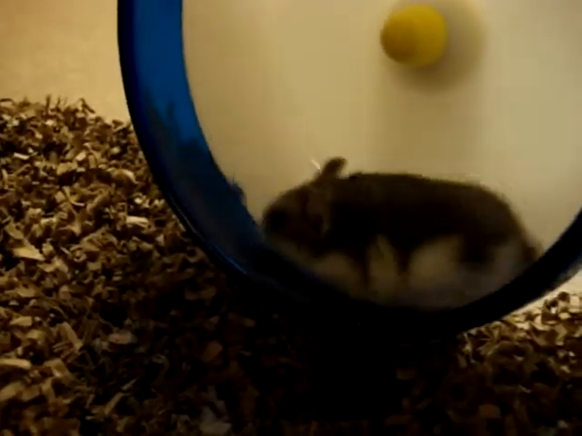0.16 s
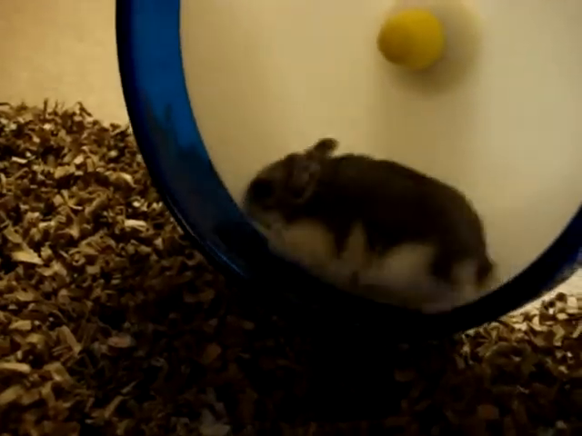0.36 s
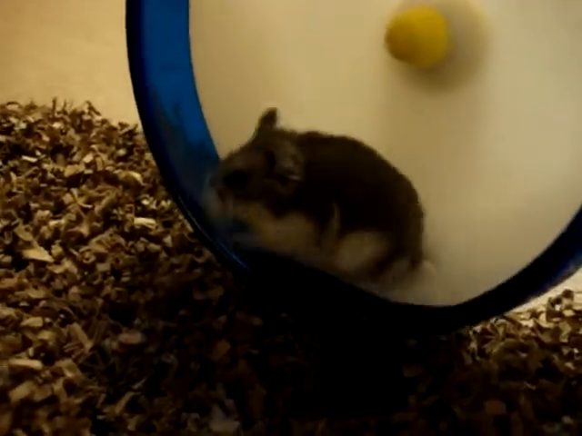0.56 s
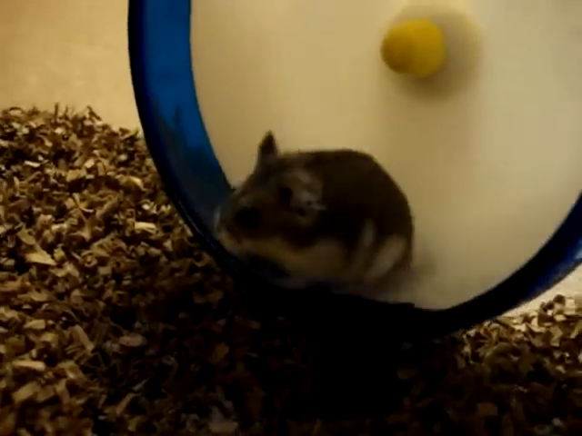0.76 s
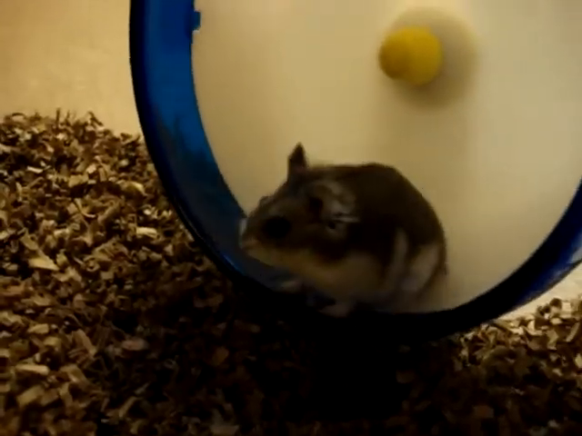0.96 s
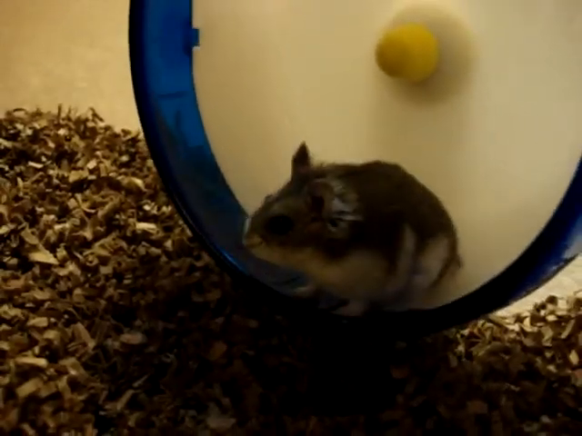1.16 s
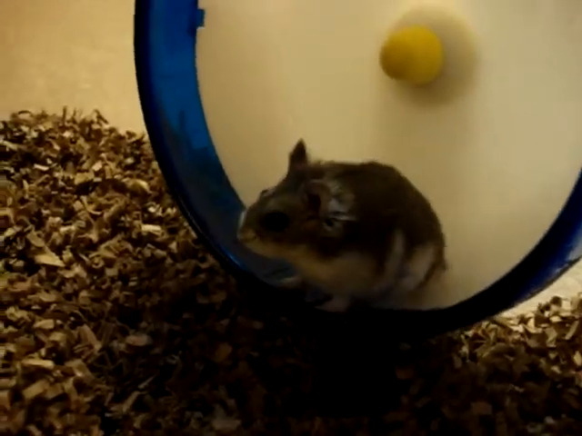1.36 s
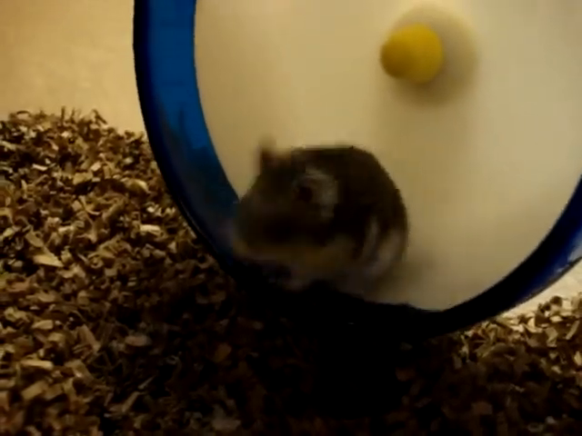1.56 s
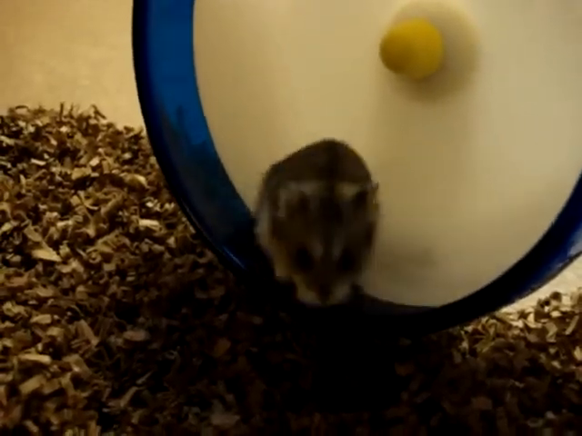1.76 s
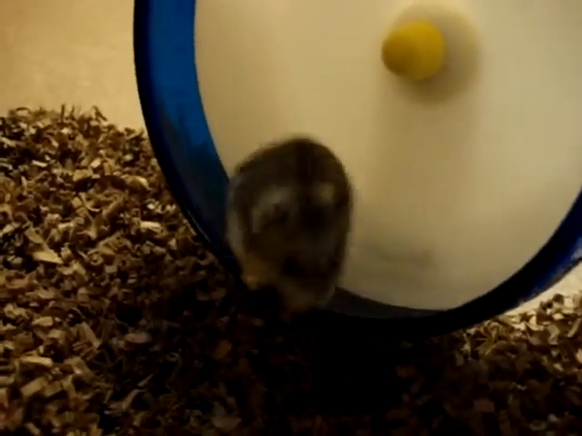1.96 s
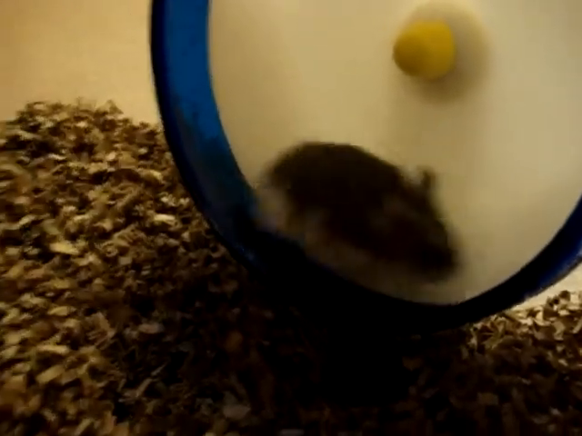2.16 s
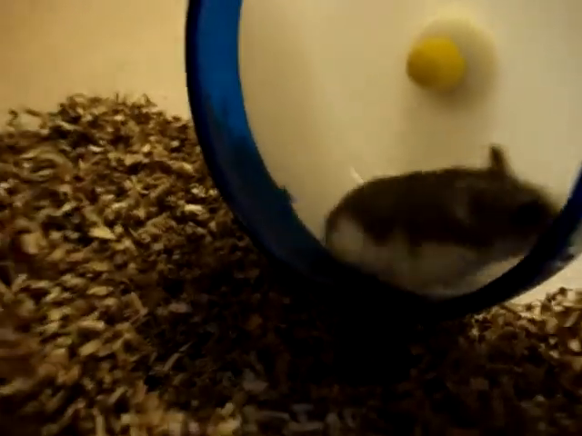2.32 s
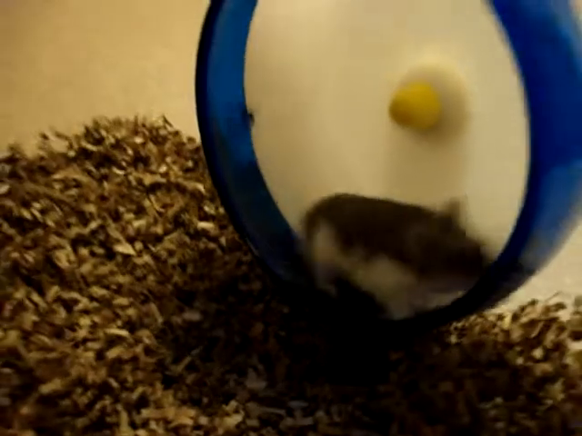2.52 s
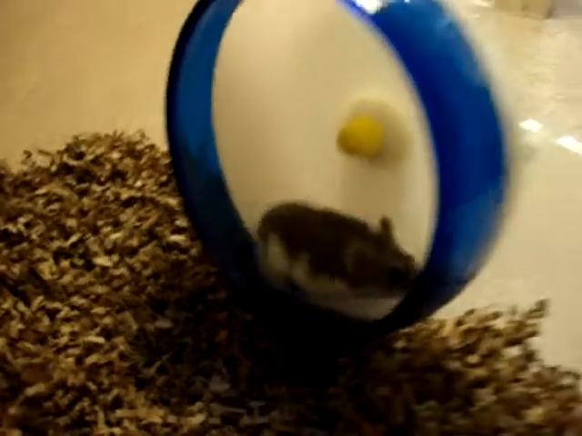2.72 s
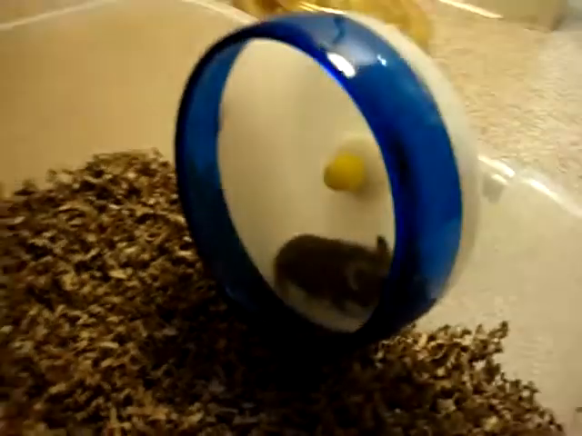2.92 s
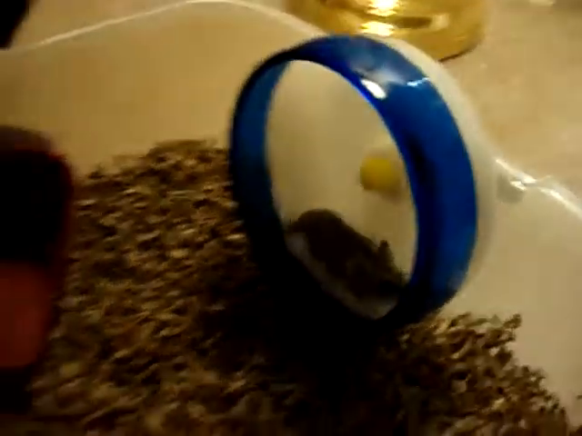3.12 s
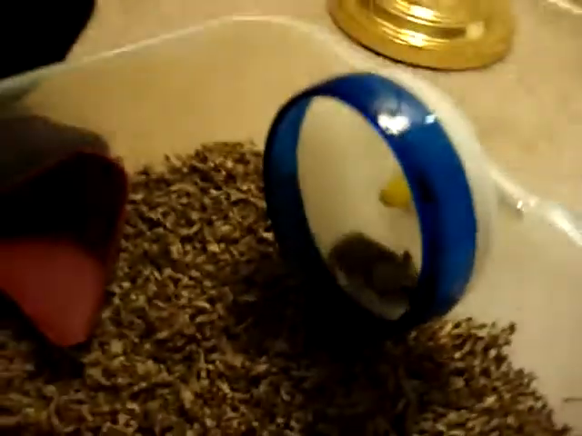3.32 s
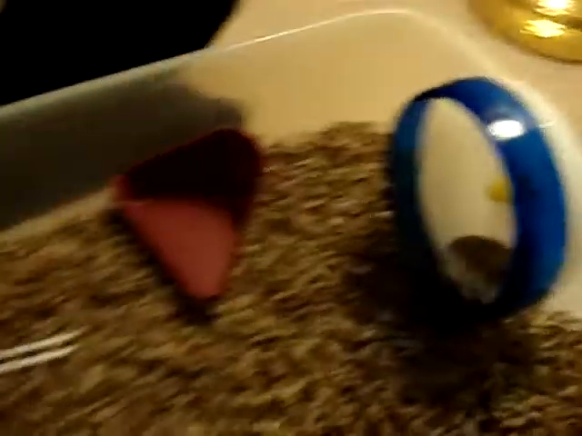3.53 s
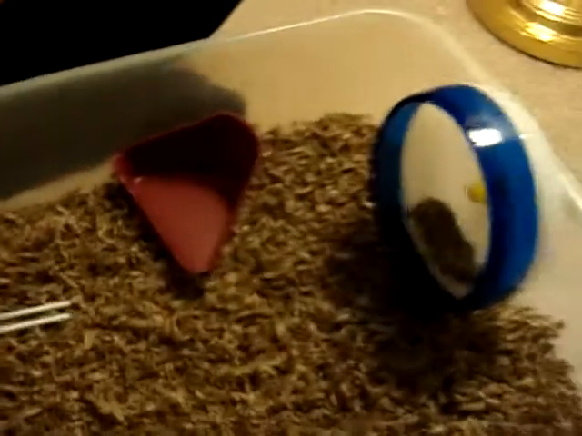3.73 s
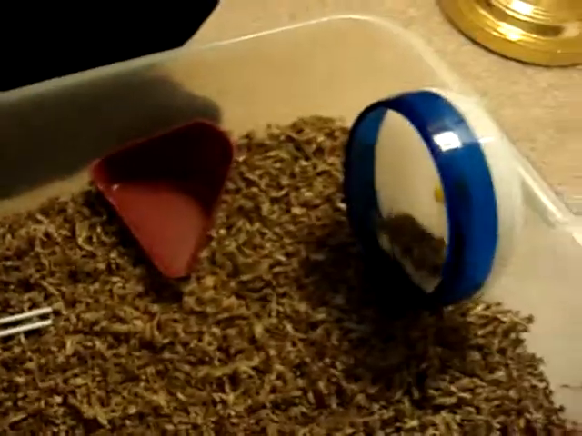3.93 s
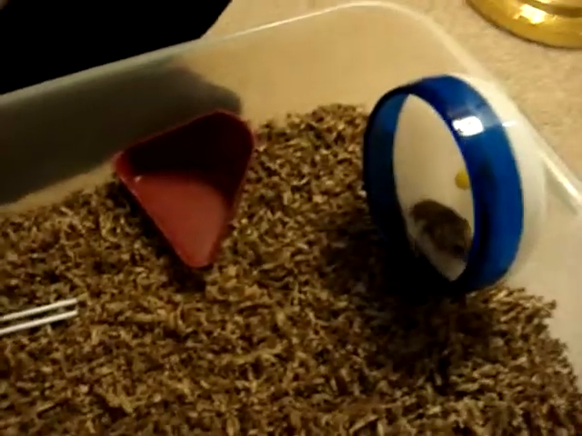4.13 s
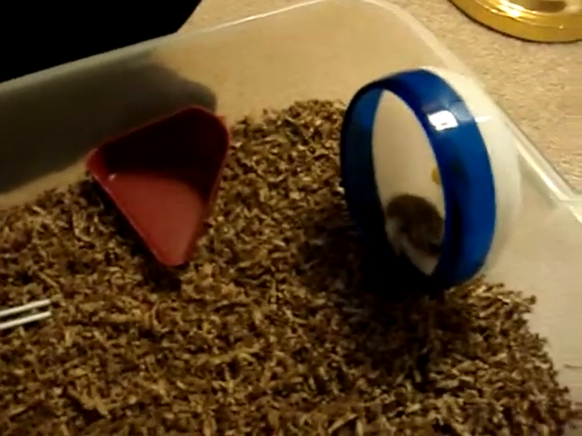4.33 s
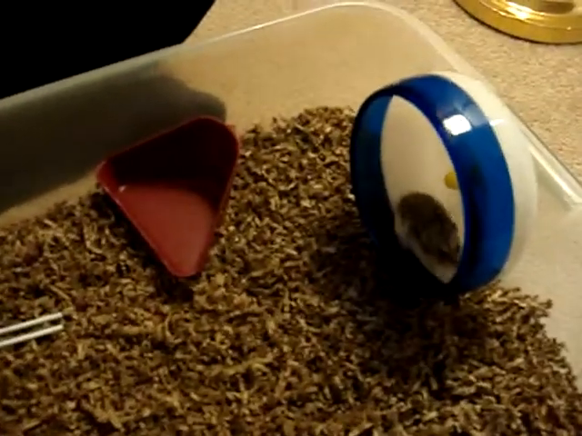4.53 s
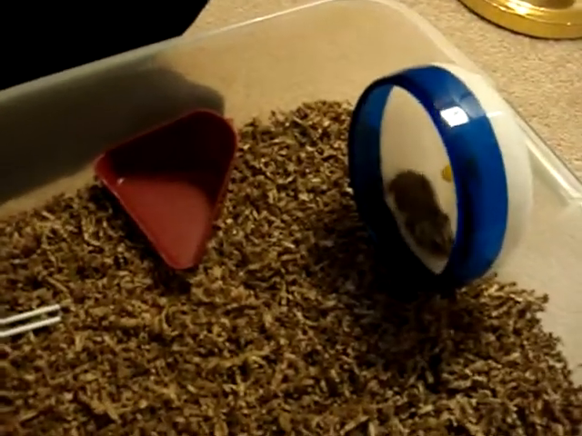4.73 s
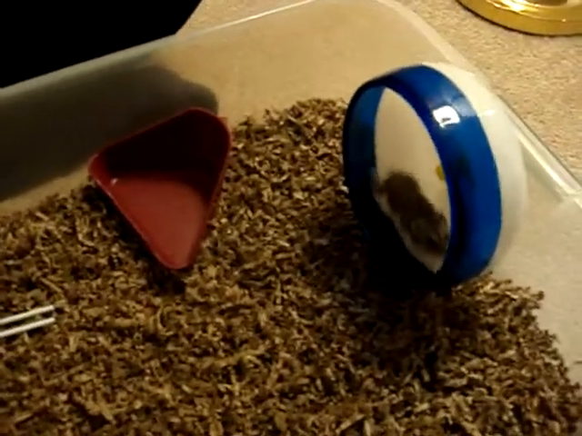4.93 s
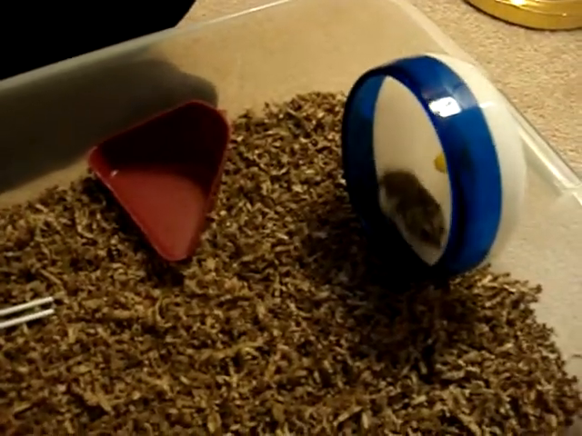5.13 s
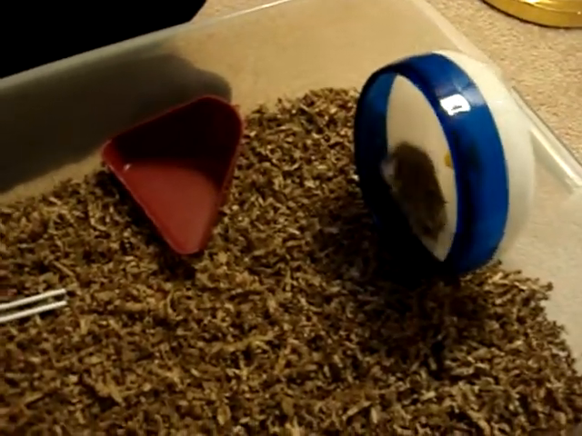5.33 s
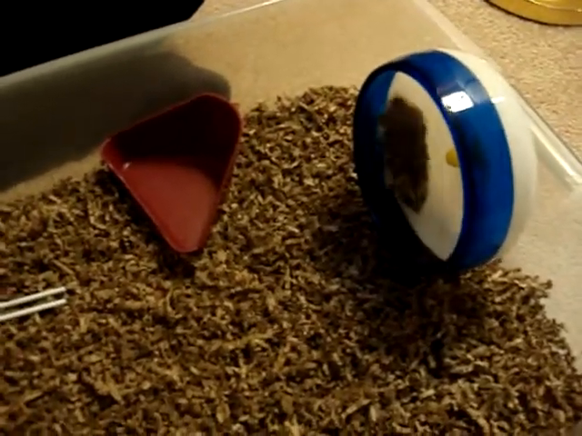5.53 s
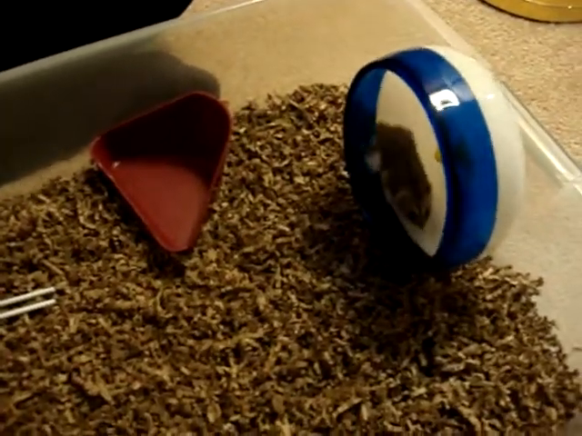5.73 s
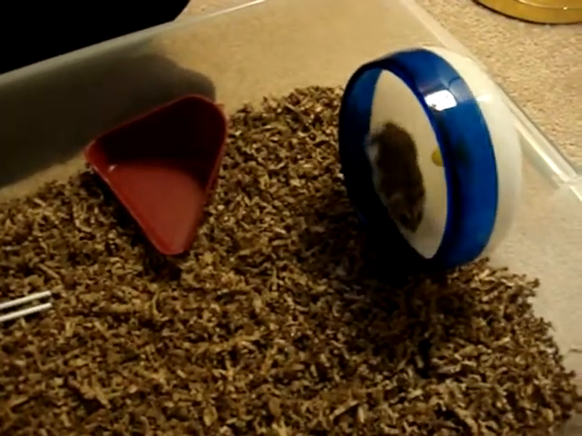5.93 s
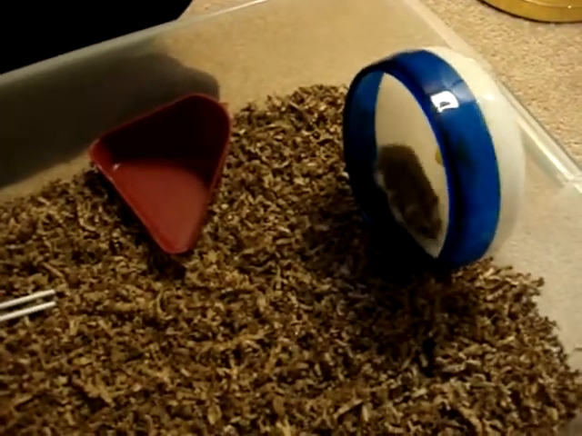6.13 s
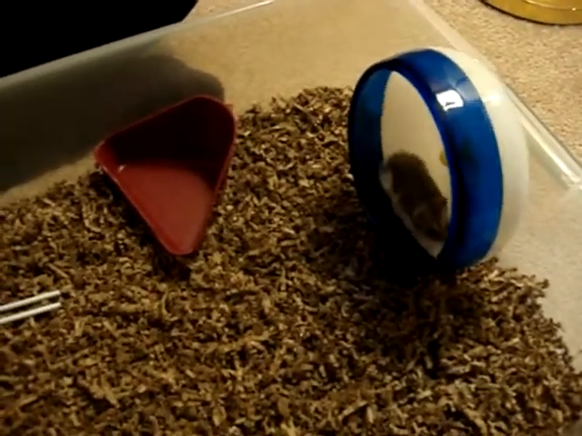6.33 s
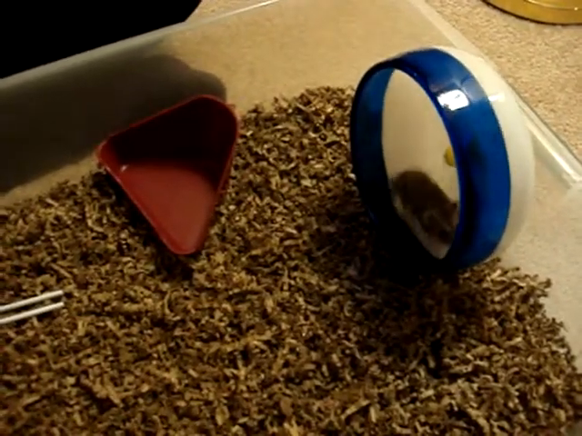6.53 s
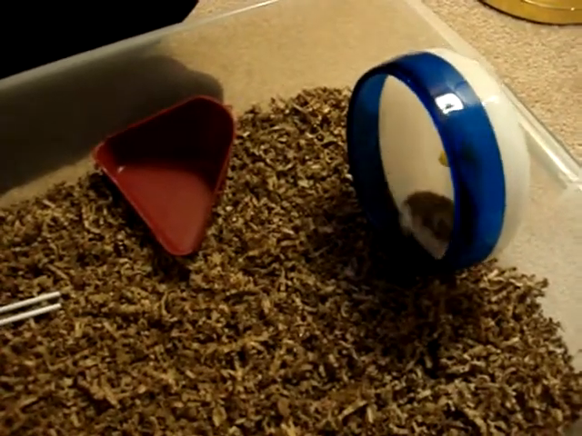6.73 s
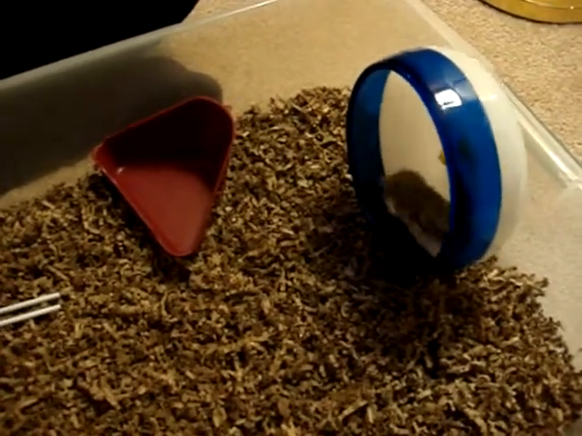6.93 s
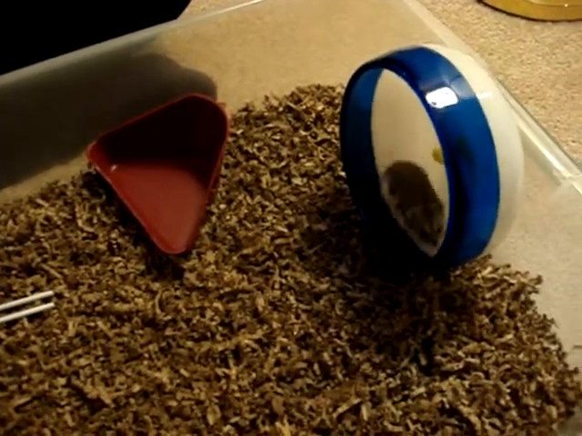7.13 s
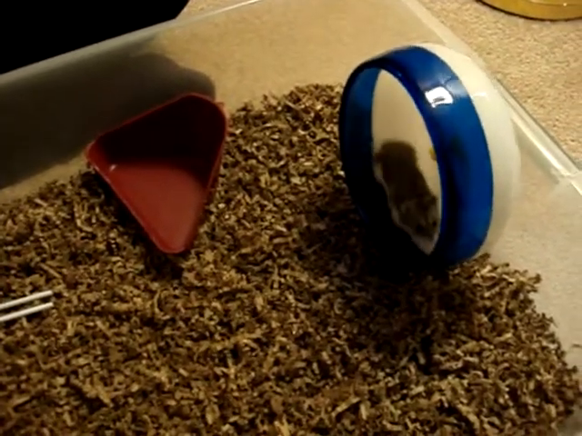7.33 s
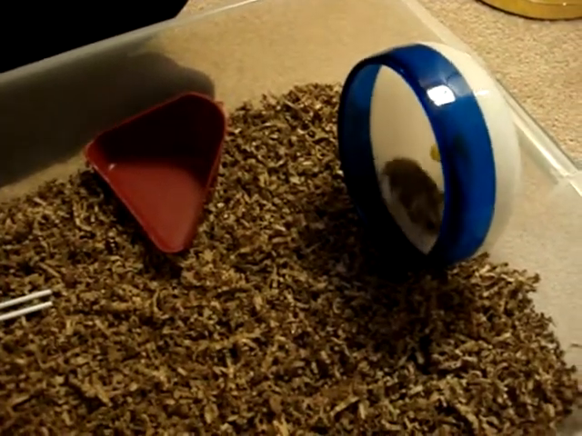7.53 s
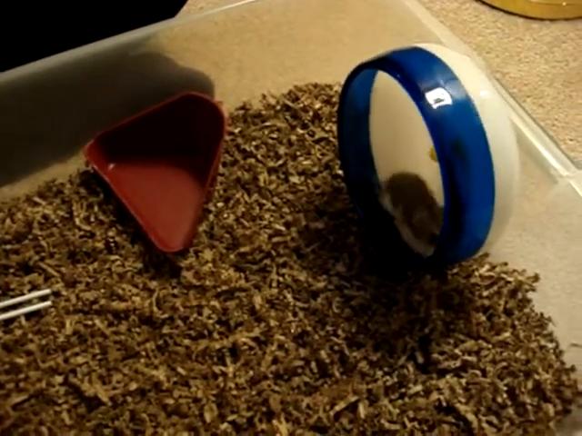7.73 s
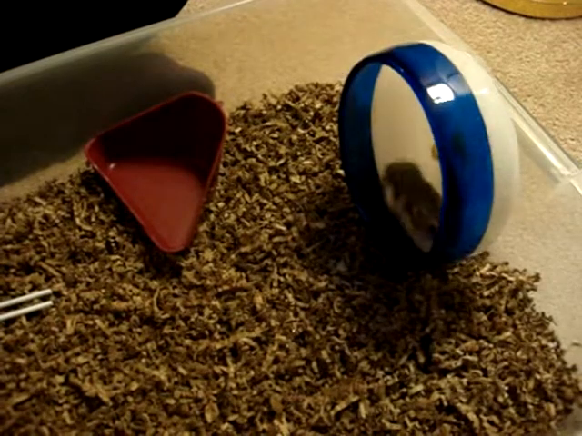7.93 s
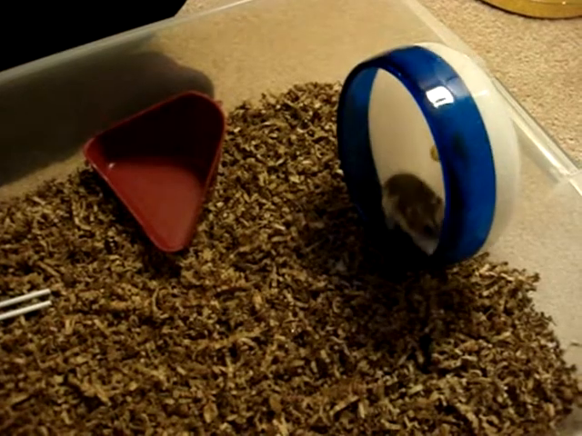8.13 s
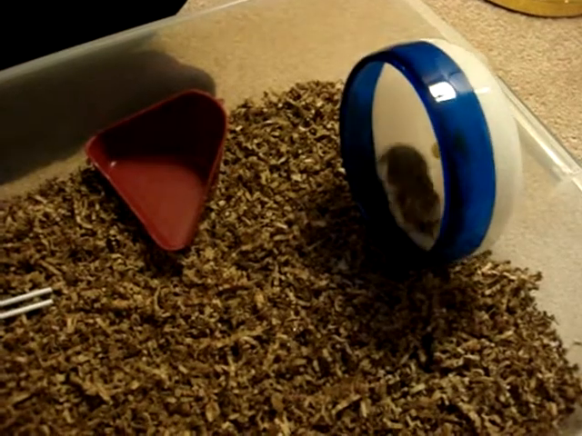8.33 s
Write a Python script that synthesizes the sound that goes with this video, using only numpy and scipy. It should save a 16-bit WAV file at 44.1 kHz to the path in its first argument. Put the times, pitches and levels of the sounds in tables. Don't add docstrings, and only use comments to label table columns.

```python
import sys
import numpy as np
from scipy import signal
from scipy.fft import rfft, irfft
from scipy.io import wavfile
from scipy.ndimage import uniform_filter1d, minimum_filter1d, map_coordinates

SR = 44100
rng = np.random.default_rng(int(sys.argv[2]) if len(sys.argv) > 2 else 0)


def makeup_ratio(level_db):
    decades = np.asarray(level_db, float) / 20
    return 10 ** decades


def generate_wav(signal):
    frames = np.transpose(np.atleast_2d(signal))
    scaled = np.clip(frames, -1, 1) * 32767
    pcm = np.round(scaled).astype(np.int16)
    wavfile.write(sys.argv[1], SR, pcm)


N = 368876
TIME = np.arange(N) / SR
SPAN = 4096
IMPACT_TIME = TIME[:SPAN // 2]


def unit(x):
    return x / np.sqrt(np.mean(x ** 2))


def decay(t, t60_s):
    return np.exp(-np.log(1000) * t / t60_s)


def shaped(points, shape=N):
    hz, db = np.transpose(points)
    noise = rng.standard_normal(shape)
    size = noise.shape[-1]
    bin_hz = np.fft.rfftfreq(size, 1 / SR) + 1
    gain = makeup_ratio(np.interp(np.log(bin_hz), np.log(hz), db, left=-90, right=-90))
    return unit(irfft(rfft(noise) * gain, size))


def walk(rate_hz):
    width = int(SR / rate_hz)
    once = uniform_filter1d(rng.standard_normal(N), width)
    return unit(uniform_filter1d(once, width))


def swells(rows):
    return sum(rise_db * np.exp(-((TIME - s) / half_s) ** 2 / 2) for s, rise_db, half_s in rows)


def grit(shape, scatter_db):
    size = np.minimum(rng.exponential(size=shape), 3.5)
    return rng.standard_normal(shape) * makeup_ratio(scatter_db * size)


def chatter(length_s, scatter_db, after_db, after_s):
    u = IMPACT_TIME / np.clip(length_s, .0005, .02)[:, None]
    swell = u * np.exp(-u ** 2 / 2)
    rattle = makeup_ratio(after_db) * (1 - np.exp(-u ** 2)) * np.exp(-(IMPACT_TIME / after_s) ** 2)
    return grit(u.shape, scatter_db) * (swell + rattle)


def ring(modes, count, spot_db, detune):
    chance = rng.standard_normal((count, 2, len(modes)))
    out = np.zeros((count, SPAN // 2))
    for k, (hz, db, t60_s) in enumerate(modes):
        mode_hz = hz * (1 + detune * chance[:, 0, k, None])
        gain = makeup_ratio(db + spot_db * chance[:, 1, k, None])
        out += gain * np.sin(2 * np.pi * mode_hz * IMPACT_TIME) * decay(IMPACT_TIME, t60_s)
    return out


def dense(push, points, db, t60_s):
    fade = decay(TIME[None, :SPAN // 2 + 1], t60_s) ** 2
    power = signal.fftconvolve(push ** 2, fade, axes=1)
    noise = shaped(points, power.shape)
    return makeup_ratio(db) * noise[:, :-1] * np.sqrt(np.abs(power))[:, :-1]


def place(start_s, peak_db, sounds):
    out = np.zeros(N + 2 * SPAN)
    sounds = sounds * (makeup_ratio(peak_db) / np.abs(sounds).max(axis=1))[:, None]
    for start, row in zip((start_s * SR).astype(int) + SPAN, sounds):
        out[start:start + len(row)] += row
    return out[SPAN:SPAN + N]


# start_s, drum_db, upper_drum_db (re drum), rim_db, treble_db (re rim)
BLOWS = [(.821, -13, 0.5, -7.5, 3.5), (3.076, -29.5, 6, -27, -1.5), (3.151, -20, -.6, -37.5, -19),
         (3.294, -19, -1, -28.5, -26), (3.337, -23, 2.5, -31, -4.5), (3.731, -22.5, 1, -26, -7),
         (3.781, -22, 0.5, -26, -6.5), (4.268, -12.5, -0.5, -15, -14.5), (4.506, -19, 2, -23, -5.5),
         (4.562, -8.5, -5, -12, -7.5), (4.875, -16.5, -5.5, -28, -8), (4.915, -6.5, -7, -10.5, -9.5),
         (4.954, -22, 8.5, -18, -10.5), (5.192, -13.5, -10, -23.5, -9), (5.252, -17.5, 4.5, -20.5, -11.5),
         (5.56, -7.5, -11, -21, -6.5), (5.621, -10, -1.5, -14.5, -19), (5.661, -28.5, 13, -18, -14.5),
         (5.982, -14, -3, -20.5, -5), (6.646, -17, 7, -12.5, -13), (7.179, -16.5, -1.2, -25, -23),
         (8.181, -17.5, -3, -24, -29), (8.209, -23.5, 11, -14, -12.5)]
BOUNCES = [(3.186, -21.5, -2, -35.5, -3), (3.84, -24.5, 0, -45, -2), (3.888, -30.5, 9, -43, -29),
           (4.168, -22, -5.5, -37, -1), (4.227, -23, -1, -38, -12), (4.449, -29.5, 10, -47, -43),
           (4.524, -18.5, 5.5, -28.5, -14), (4.616, -14, -3, -23.5, -12), (5.071, -26, -12, -41.5, -2),
           (5.289, -22, 7.5, -24.5, -20), (5.601, -40.5, 17.5, -37, -34), (6.047, -29, 1.5, -42, -5),
           (6.115, -19.5, -9.5, -43, -20), (6.158, -21, 1.5, -29.5, -16), (6.607, -29, 8, -55, -8),
           (6.692, -30, 7.5, -40, -8), (6.782, -20.5, -3.3, -60, -8), (7.309, -23.5, -8, -38.5, -24),
           (7.651, -19, -2, -34.5, -19), (7.699, -26.5, 2, -50, -20), (7.784, -29, 1.5, -36, -25),
           (8.077, -25.5, -2.5, -35, -25), (8.12, -22.5, -1, -35, 0.5), (8.159, -29, -2, -54, -24)]
# start_s, peak_db, upper_drum_db (re peak)
KNOCKS = [(3.169, -28.5, -18), (3.211, -28, -5), (3.385, -24, -5), (3.484, -30, -22), (3.802, -23.5, 0.5),
          (4.05, -29, -15), (4.103, -33, -26), (4.246, -19, -1), (4.395, -30, -19), (4.597, -31, 17),
          (4.651, -32, 10), (4.968, -17.5, -13.5), (5.034, -29, -13), (5.145, -30, -27), (5.232, -34, 9),
          (5.374, -30, -26), (5.682, -18.5, -18), (5.731, -23.5, -20), (5.92, -31, -23), (6.238, -38, -21),
          (6.296, -32, -8), (6.719, -22, -9), (6.764, -27, 0.5), (7.254, -36, -2), (7.493, -48, -15),
          (7.588, -35, -30), (7.675, -26, 1.5), (8.046, -29, -26), (8.108, -38, 5), (8.234, -20.5, 4)]
# start_s, peak_db, upper_drum_db
# (re peak), main_hz
SOFT_KNOCKS = [(.004, -34.5, -26, 718), (.053, -39.5, -21, 784), (.13, -37.5, -23, 780),
               (.189, -38.5, -17, 794), (.287, -43.5, 3, 740), (.462, -38, -22, 728), (.556, -26, -8, 802),
               (.574, -32.5, -23, 792), (.724, -27, -33, 733), (0.781, -15, -5.5, 796),
               (.799, -21, -17, 701), (2.182, -39, -3, 810), (2.28, -30, -3, 757), (2.373, -38, 1.5, 807),
               (2.464, -33, -7, 694), (2.601, -30, -21, 732), (2.909, -31.5, -11, 671)]
# mode_hz, level_db, t60_s
DRUM_MODES = [(735.5, 3, 0.062), (775, 11.5, 0.033), (787, 1, 0.064)]
# mode_hz, level_db, t60_s
UPPER_DRUM_MODES = [(508, -2, 0.052), (690, 5.5, 0.012), (965, 10, 0.025), (986, -9, 0.044),
                    (1160, 15, 0.0078), (1313, -7.5, 0.036), (1366, -4.5, 0.04), (1494, 0, 0.054),
                    (1446, -14.5, 0.21), (1860, -34.5, 0.082)]


def knocks():
    chatter_s, build_up_s = .005, .0058
    drum_lag_s = .0045
    both = np.array(BLOWS + BOUNCES)[:, :3] + [drum_lag_s, 0, 0]
    soft = np.array(SOFT_KNOCKS)
    s, peak_db, upper_db = np.vstack([soft[:, :3], both, KNOCKS]).T
    count = len(s)
    main_hz = 775 * (1 + 0.023 * rng.standard_normal(count))
    main_hz[:len(soft)] = soft[:, 3]
    t = IMPACT_TIME
    push = chatter(np.full(count, chatter_s), scatter_db=3.0, after_db=-7.5, after_s=0.031)
    wave = np.sin(2 * np.pi * main_hz[:, None] * t)
    main = wave * decay(t, 0.038) + makeup_ratio(-14.5) * ring(DRUM_MODES, count, spot_db=6.0, detune=0.022)
    in_step = makeup_ratio(-3.5) * wave * t / build_up_s * np.exp(-(t / build_up_s) ** 2 / 2)
    low = signal.fftconvolve(push + in_step, main, axes=1)
    high = signal.fftconvolve(push, ring(UPPER_DRUM_MODES, count, spot_db=6.0, detune=0.019), axes=1)
    high = high + dense(push, SCUFF_TONE, db=-6.5, t60_s=0.18)
    start_s = s - 1.1 * chatter_s
    return place(start_s, peak_db, low) + place(start_s, peak_db + upper_db, high)


# start_s, peak_db, treble_db
TICKS = [(0.532, -45, -10), (.774, -20, -6), (1.35, -43, -6), (2.252, -32, -23), (2.51, -43.5, 6.5),
         (2.598, -45, 15), (2.746, -40.5, -6), (2.846, -38.5, 5), (2.901, -38, -4), (2.939, -43, 4),
         (3.031, -39.5, 4), (3.433, -36.5, -10.5), (3.451, -41, 0), (3.994, -41, -20.1), (4.426, -31, -3.5),
         (4.729, -36, -17), (4.847, -46, 2), (5.048, -39.5, -5), (5.404, -51, 5), (5.547, -23.5, 2.3),
         (5.782, -35, 10), (5.848, -37, -5), (5.91, -39, 6.5), (6.508, -40, 8), (6.801, -43, -17),
         (7.082, -43.5, 7), (7.417, -41.5, 0), (7.599, -37, 6), (7.9, -43, -10), (8.057, -39, 9)]
# mode_hz, level_db, t60_s
RIM_MODES = [(2490, -1, 0.024), (2650, -3.5, 0.028), (2820, -24, 0.01), (3434, 1.5, .025),
             (3200, -1.5, 0.0077), (4700, -19.5, 0.0064)]
# freq_hz, density_db (per Hz)
RIM_DENSE = [(1000, -3), (1800, -10.5), (2700, 1.5), (3500, 2), (4600, -4), (5600, -6.5)]
# freq_hz, density_db (per Hz)
RIM_TREBLE = [(3300, -21.5), (4300, -0.2), (6500, -1.5), (8000, -5), (10000, -14.5), (11000, -42)]


def ticks():
    both = np.array(BLOWS + BOUNCES)[:, [0, 3, 4]]
    s, peak_db, treble_db = np.vstack([both, TICKS]).T
    length_s = np.repeat([.0042, .007, .0025], [len(BLOWS), len(BOUNCES), len(TICKS)])
    push = chatter(length_s, scatter_db=5.0, after_db=-11.5, after_s=3.9 * length_s[:, None])
    low = signal.fftconvolve(push, ring(RIM_MODES, len(s), spot_db=7.0, detune=0.023), axes=1)
    low = low + dense(push, RIM_DENSE, db=4.5, t60_s=0.059)
    high = dense(push, RIM_TREBLE, db=0, t60_s=0.016)
    return place(s - 0.371 * length_s, peak_db, low) + place(s - 0.44 * length_s, peak_db + treble_db, high)


# time_s, bearing_db
ROLL = [(0.0, -48.5), (.44, -59.5), (1.35, -84.5), (2.21, -62.5), (2.44, -51), (2.79, -45), (3.49, -44),
        (4.17, -42.5), (4.45, -46.5), (4.96, -36.5), (5.12, -39.5), (5.31, -37.5), (5.62, -48), (6.15, -40),
        (6.31, -46.5), (7.66, -42), (8.36, -44)]


def rolling_db():
    return np.interp(TIME, *np.transpose(ROLL))


# mode_hz, level_db, t60_s
ROLL_MODES = [(748, -5.5, 0.086), (784, -2, 0.09), (1020, -23.5, 0.036), (1439, -16, 0.062)]


def bearing(level_db):
    rough = grit(N, 0.98) * makeup_ratio(2.67 * walk(28))
    rung = signal.fftconvolve(rough, ring(ROLL_MODES, 1, 0, 0)[0])[:N]
    bend = np.cumsum(.017 * walk(14.5))
    bend = bend - uniform_filter1d(bend, size=SR // 2)
    return makeup_ratio(level_db) * unit(map_coordinates(rung, [np.arange(N) + bend], mode="mirror"))


# time_s, rise_db, half_length_s
SCUFF = [
    (4.4, 18, 0.18),
    (8.36, 6.5, 0.077),
]
# freq_hz, density_db (per Hz)
SCUFF_TONE = [(500, -45), (1000, 8.5), (1500, 3.5), (2700, 3), (4500, -5), (7000, -23)]


def claws(effort_db):
    level_db = -55 + 1.2 * effort_db + swells(SCUFF)
    uneven = uniform_filter1d(np.abs(grit(N, 10)), size=60) * makeup_ratio(4.2 * walk(32))
    return makeup_ratio(level_db) * unit(uneven * shaped(SCUFF_TONE))


# mode_hz, level_db, t60_s
STAND_MODES = [(316, -13, 0.066), (449, -8.5, 0.021)]


def stand(wheel):
    shake = uniform_filter1d(np.abs(wheel), size=200) * rng.standard_normal(N)
    return makeup_ratio(-33) * signal.fftconvolve(shake, ring(STAND_MODES, 1, 0, 0)[0])[:N]


def tub(wheel):
    t = np.arange(SR // 4) / SR
    tail = rng.standard_normal(len(t)) * decay(t, 0.24) * np.clip(t / 0.0016, 0, 1)
    tail = signal.sosfilt(signal.butter(1, 3520, fs=SR, output="sos"), tail)
    return makeup_ratio(-16.5) * signal.fftconvolve(wheel, tail / np.linalg.norm(tail))[:N]


# start_s, peak_db, pitch_hz, t60_s
THUD = [
    (0.821, -23, 41.67, 0.062),
]


def thud():
    (start_s, peak_db, pitch_hz, t60_s), = THUD
    t = np.clip(TIME - start_s, 0, None)
    return makeup_ratio(peak_db) * np.sin(2 * np.pi * pitch_hz * t) * decay(t, t60_s)


# time_s, rise_db, half_length_s
STIRS = [
    (2.5, 7.5, 0.1),
    (4.33, 5, 0.14),
    (5.54, 4, 0.033),
    (6.31, 6.5, 0.11),
]
# freq_hz, density_db (per Hz)
RUSTLE = [(1200, -42), (2500, -1), (4000, 0.5), (7000, -2), (10000, -6.5)]


def chips(effort_db):
    level_db = -57 + 0.1 * effort_db + swells(STIRS)
    return makeup_ratio(level_db + 2.2 * walk(64)) * shaped(RUSTLE)


# time_s, level_db
HUM = [
    (2.8, -74),
    (3.67, -57),
    (7.399, -72.5),
]


def hum():
    time_s, level_db = np.transpose(HUM)
    pitch_hz = 66.3 * (1 + 0.013 * walk(4.3))
    phase = np.cumsum(2 * np.pi * pitch_hz / SR)
    level_db = np.interp(TIME, time_s, level_db, left=-90, right=-90) + 1.8 * walk(4.3)
    return makeup_ratio(level_db) * np.sqrt(2) * np.sin(phase)


# freq_hz, density_db (per Hz)
ROOM = [(12, -35), (20, -22), (37, -25.5), (58, -11), (189, -5), (319, -6.5), (345, -8), (472, -9.5),
        (566, -11), (2790, -21), (3010, -26.5), (7520, -36.5), (10300, -48), (13400, -38), (22000, -120)]


def room():
    return makeup_ratio(-52 + 0.99 * walk(3.4)) * shaped(ROOM)


def scene():
    roll_db = rolling_db()
    effort_db = roll_db + 42
    wheel = knocks() + ticks() + claws(effort_db) + bearing(roll_db + 3.5)
    wheel = signal.sosfilt(signal.butter(4, 633, "high", fs=SR, output="sos"), wheel)
    wheel = wheel + stand(wheel)
    return (wheel + tub(wheel) + chips(effort_db) + hum() + thud() + room())[None]


# freq_hz, margin_db
DROPOUT_MARGIN = [(300, 60), (800, 28), (2000, 25), (4000, 21), (7000, 17), (11000, 15)]
# freq_hz, threshold (standard deviations)
DROPOUT = [3000, 6000, 10000], [-2.6, -1.5, -1.1]


def band_dropouts(x):
    hop, ahead_s, behind_s = 48, .022, .012
    f, _, z = signal.stft(x, SR, nperseg=192, noverlap=192 - hop)
    power = uniform_filter1d(np.abs(z) ** 2, size=4, axis=-2)
    level_db = 10 * np.log10(uniform_filter1d(power, size=3) + 1e-20)
    ahead, behind = int(ahead_s * SR / hop), int(behind_s * SR / hop)
    coming_db = -minimum_filter1d(-level_db, ahead + behind, origin=(behind - ahead) // 2 + 1)
    hz, margin_db = np.transpose(DROPOUT_MARGIN)
    spare_db = level_db - coming_db + np.interp(np.log(f + 1), np.log(hz), margin_db)[:, None]
    patches = np.kron(rng.standard_normal((len(f) // 2 + 1, N // 576 + 2)), np.ones((2, 12)))
    patches = patches[:len(f), :z.shape[-1]]
    keep = np.clip(.5 + (spare_db + 4 * patches) / 4, .01, 1)
    keep[..., patches < np.interp(f, *DROPOUT)[:, None]] = .05
    return signal.istft(z * keep, SR, nperseg=192, noverlap=192 - hop)[1][..., :N]


def roll_off(x):
    return signal.sosfilt(signal.butter(12, 10440, fs=SR, output="sos"), x)


def record(dry):
    ceiling = .75
    rounded = ceiling * np.tanh(dry / ceiling)
    x = signal.sosfilt(signal.ellip(10, .3, 75, 10120, fs=SR, output="sos"), rounded)
    mix = band_dropouts(x)
    return roll_off(mix)


dry = scene()
out = record(dry)
generate_wav(out)
```